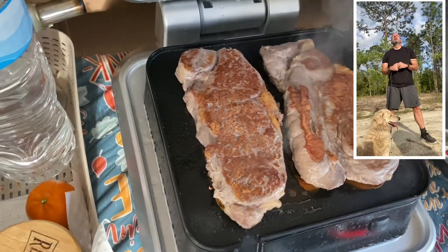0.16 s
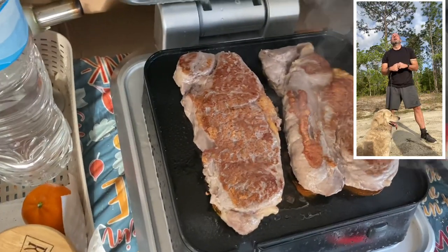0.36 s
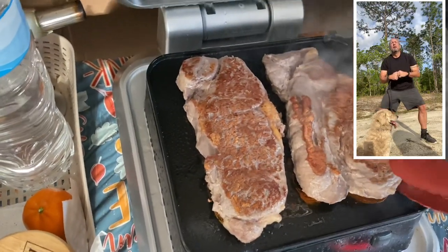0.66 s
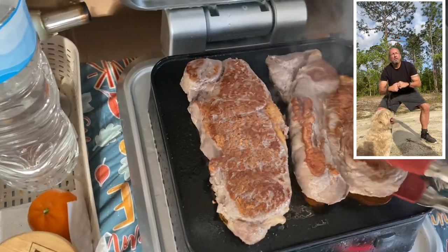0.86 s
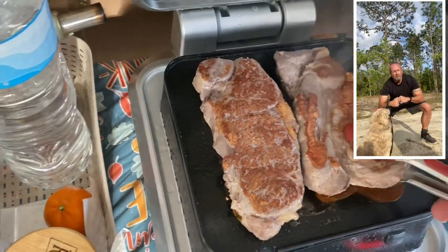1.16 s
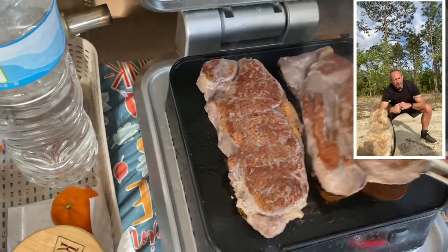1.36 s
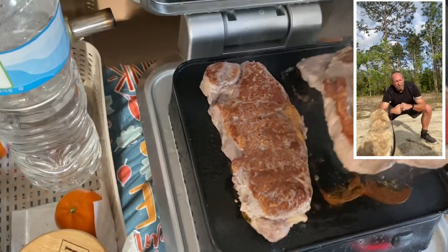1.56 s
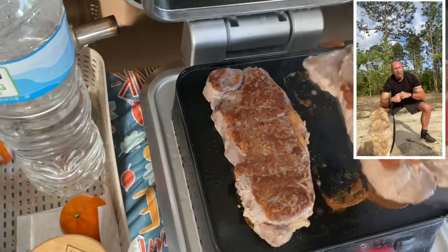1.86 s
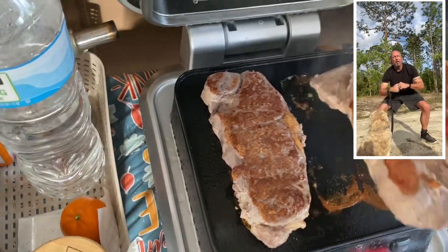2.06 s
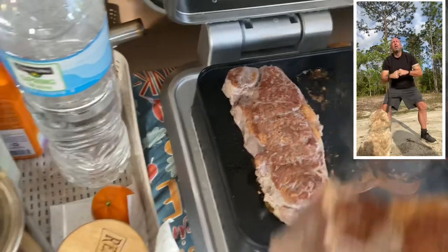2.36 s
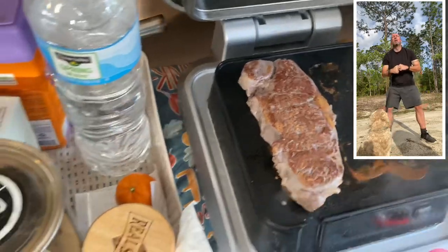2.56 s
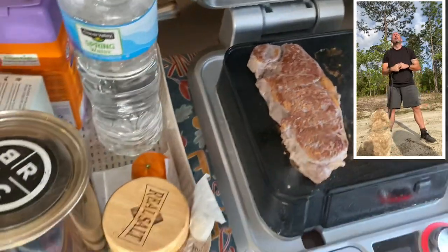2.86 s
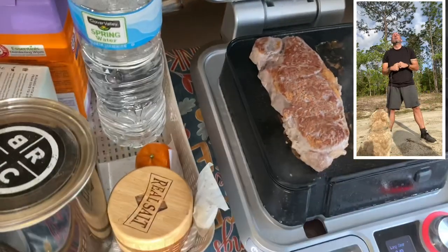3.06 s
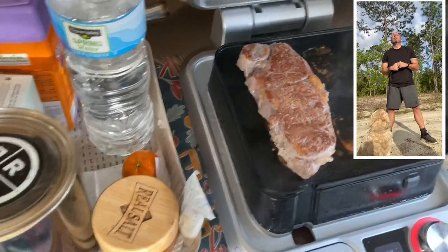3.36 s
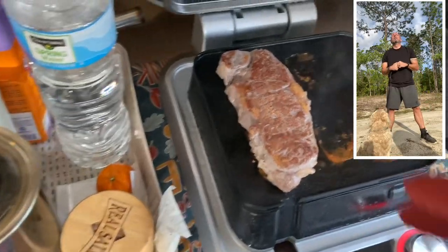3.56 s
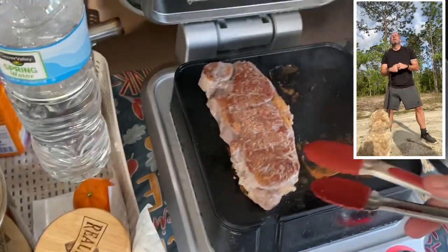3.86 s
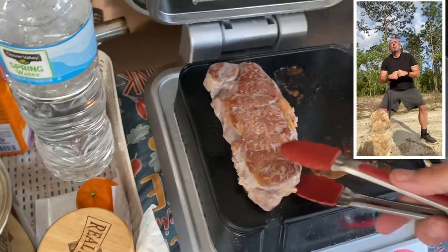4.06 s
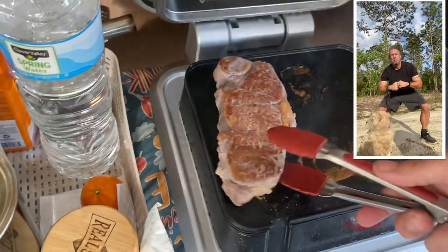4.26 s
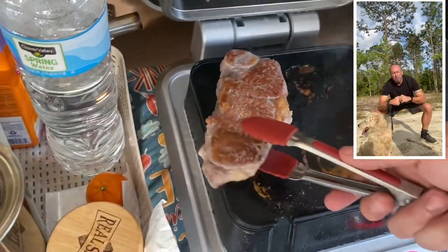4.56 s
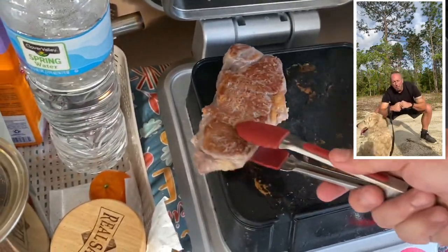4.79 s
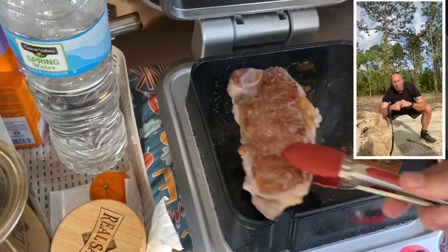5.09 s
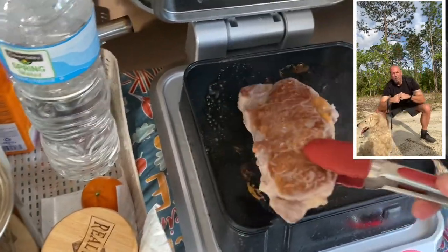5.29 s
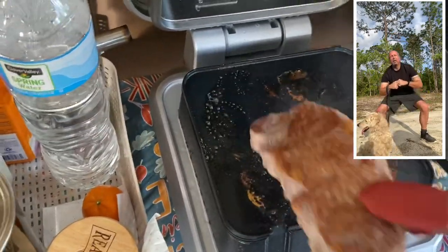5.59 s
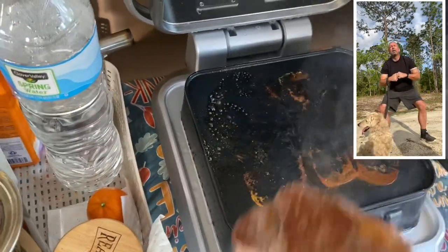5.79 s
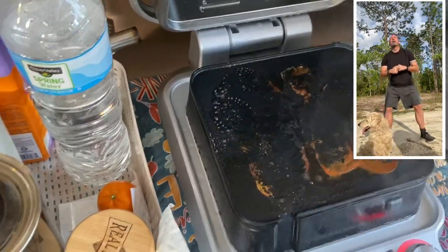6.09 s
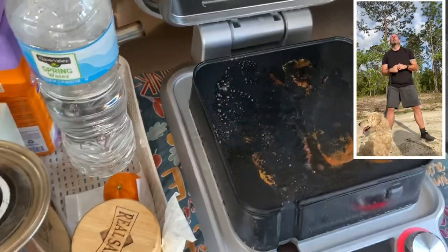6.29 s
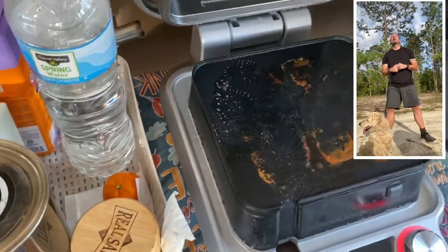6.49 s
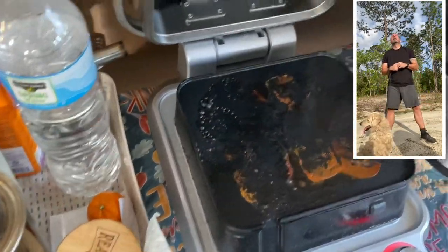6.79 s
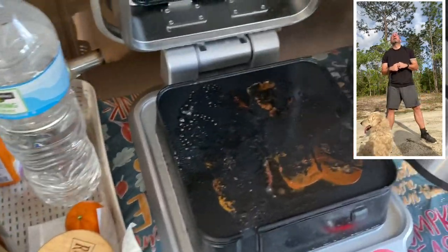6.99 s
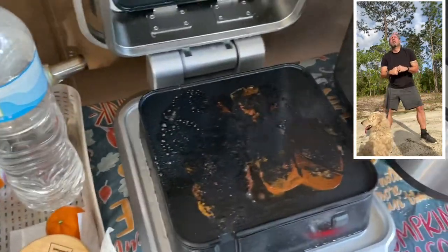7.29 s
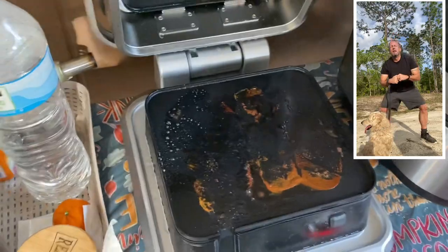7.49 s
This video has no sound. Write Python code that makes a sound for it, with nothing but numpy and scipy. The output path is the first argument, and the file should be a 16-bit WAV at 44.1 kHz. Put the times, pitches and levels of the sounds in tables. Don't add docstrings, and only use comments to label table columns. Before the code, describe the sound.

Meat sizzles in a dense close crackle with sharp fat cracks, swells as it is lifted, then fades to sparse patter and faint squeaks on the plate.

```python
import sys
import numpy as np
from scipy import signal
from scipy.fft import rfft, irfft, next_fast_len
from scipy.io import wavfile
from scipy.ndimage import uniform_filter1d, map_coordinates

SR = 44100
rng = np.random.default_rng(int(sys.argv[2]) if len(sys.argv) > 2 else 0)


def gain_from_db(level_db):
    decades = np.asarray(level_db, float) / 20
    return 10 ** decades


def master(y):
    cut = np.clip(np.atleast_2d(y).T, -1, 1)
    pcm = np.round(cut * 32767)
    wavfile.write(sys.argv[1], SR, pcm.astype(np.int16))


N = 336914


def unit(x):
    return x / np.sqrt(np.mean(x ** 2) + 1e-20)


def along(points, hz):
    f, v = np.transpose(points)
    return np.interp(np.log(hz + .1), np.log(f + .1), v)


def curves(rows, at):
    s, *cols = np.transpose(rows)
    return [np.interp(at, s, c) for c in cols]


def wobble(rate):
    knots = rng.standard_normal(int(N * 200 / SR))
    return map_coordinates(knots, [np.arange(N) * min(rate, 190) / SR], order=2)


def noise(gain):
    m = next_fast_len(N)
    spectrum = rfft(rng.standard_normal(m)) * gain(np.fft.rfftfreq(m, 1 / SR))
    return unit(irfft(spectrum, m)[:N])


def impulse(gain):
    size = 16384
    cepstrum = irfft(np.log(gain(np.fft.rfftfreq(size, 1 / SR)) + 1e-6))
    cepstrum[1:size // 2] *= 2
    cepstrum[size // 2 + 1:] = 0
    return irfft(np.exp(rfft(cepstrum)))[:size // 8]


# pitch_hz, density_db (per Hz)
PLATE_COLOUR = [(300, -26.5), (500, -11), (700, -22.5), (850, -10.5), (1400, -1), (2500, 1), (3500, 3.5),
                (4250, -4), (4750, -13), (6300, 0.5), (7000, -4.5), (7900, -13), (11300, -16.5),
                (12600, -24), (15800, -25.5)]


def plate_gain(hz):
    return gain_from_db(along(PLATE_COLOUR, hz))


def plate_band(edges):
    lo, hi = edges

    def gain(hz):
        return plate_gain(hz) / np.sqrt((1 + (lo / (hz + 1)) ** 16) * (1 + (hz / hi) ** 16))
    return impulse(gain)


def bubbles(cycles):
    draws = rng.random((9000, 3))
    t = np.arange(384) / SR
    hz = 700 + 14500 * draws[:, 1:2] ** 1.5
    size = -np.log(draws[:, 2:] + 0.12) * np.sqrt(hz)
    rings = size * np.sin(2 * np.pi * hz * t * (1 + 8 * t)) * np.exp(-t * hz / cycles)
    place = (draws[:, :1] * N).astype(int) + np.arange(len(t))
    return unit(np.bincount(place.ravel(), rings.ravel())[:N])


# start_s, vigour_db, fineness_db
FRYING = [(0, -37.5, -2), (.8, -38, -3.5), (.97, -32.5, -4.5), (1.27, -33, -2.5), (1.5, -43.5, -1),
          (1.7, -44.5, 2.2), (2.3, -45, 0.2), (4.05, -46.5, 2.3), (4.32, -41, 0), (4.7, -43, -6),
          (4.98, -39.5, -5.5), (5.2, -46, 2), (5.9, -56, 2.5), (6.1, -55.5, 0.1), (6.75, -64.5, 7),
          (6.98, -75, 8), (7.15, -62, -5), (7.64, -66, -8)]
# low_hz, high_hz
BANDS = [
    (200, 2400),
    (2400, 4800),
    (4800, 8000),
    (8000, 17000),
]
# calm_level_db, growth_with_vigour (dB per dB), growth_with_fineness (dB per dB)
BAND_LEVELS = [
    (-50.5, 0.98, 0.35),
    (-45.5, 0.95, 0.019),
    (-48.5, 0.99, 0.65),
    (-53.5, 0.71, 0.4),
]
# start_s, spread_db
SIZE_SPREAD = [(0, 2.5), (5, 2.5), (5.8, 4), (7.64, 5)]
# centre_s, extra_fineness_db
FLARES = [
    (.55, 1.5),
    (1.67, 5),
    (2.07, 3),
    (2.62, 2.5),
    (3.4, 1),
    (4.86, 2),
    (5.72, 4),
    (6.05, 1.5),
]


def crackle():
    t = np.arange(N) / SR
    draws = rng.random((30000, 7))
    s = draws[:, 0] * (N - 1) / SR
    place = (s * SR).astype(int)
    spread_db, = curves(SIZE_SPREAD, s)
    polarity = np.sign(draws[:, 2] - .5)
    size = gain_from_db(-spread_db * np.log(draws[:, 1] + .004)) * polarity
    clump = gain_from_db(0.28 * wobble(14) + 0.11 * wobble(45) + 0.067 * wobble(120))

    vigour_db, fine_db = curves(FRYING, t)
    flare_s, steak_calm_db = 0.049, -45
    for at, db in FLARES:
        fine_db = fine_db + db * np.exp(-((t - at) / flare_s) ** 2)

    rings = .5 * bubbles(cycles=4.0)
    wet = np.interp(t, [5, 6], [1, .45])
    out = np.zeros(N)
    for k, (edges, (calm_db, grows, fines)) in enumerate(zip(BANDS, BAND_LEVELS)):
        brightness = gain_from_db(10.3 * (draws[:, 3 + k] - .5))
        bursts = np.bincount(place, size * brightness, N)
        power = uniform_filter1d(uniform_filter1d(bursts ** 2, SR // 4), SR // 4)
        bursts /= np.sqrt(np.abs(power) + 1e-12)
        steam = 1.4 * wet * rng.standard_normal(N)
        band = signal.oaconvolve(bursts + rings + steam, plate_band(edges))[:N]
        level_db = calm_db + grows * (vigour_db - steak_calm_db) + fines * fine_db
        level_db = level_db + 0.21 * wobble(40) + 0.38 * wobble(6)
        out += gain_from_db(level_db) * clump * wet ** 0.073 * unit(band)
    return out


# pitch_hz, density_db (per Hz)
ROOM_COLOUR = [(26, -30), (45, -13), (75, -19), (170, -23), (250, -17), (510, -18), (665, -24), (755, -16),
               (880, -22), (1310, -21), (3640, -28), (4730, -40), (6650, -33), (15800, -56)]
# start_s, level_db
ROOM_LEVEL = [(0.0, -59.5), (1.17, -57), (1.53, -59), (6.49, -61.5), (7.64, -60)]
# pitch_hz, level_db (rms)
HUM = [
    (120, -73),
    (297, -73),
    (372, -76),
    (512, -78),
    (757, -82),
    (1497, -74),
]
# pitch_hz, density_db (per Hz)
AIR_COLOUR = [(1, -61), (3, -6.5), (5, 6), (8, 8), (14, -18.5), (23, -16.5), (27, -17), (31, -33),
              (60, -72)]


def background():
    t = np.arange(N) / SR
    level_db, = curves(ROOM_LEVEL, t)
    room = gain_from_db(level_db + 1.5 + 0.9 * wobble(2.985)) * noise(lambda hz: gain_from_db(along(ROOM_COLOUR, hz)))
    hum = np.zeros(N)
    for hz, db in HUM:
        level = gain_from_db(db + 3 + 1.5 * wobble(5))
        hum += level * np.sin(2 * np.pi * hz * t + .7 * wobble(5))
    air = gain_from_db(-42.0) * np.tanh(20 * t) * noise(lambda hz: gain_from_db(along(AIR_COLOUR, hz)))
    return room + hum + air


CRACK_LEAD = 64


def crack(edges):
    lo, hi = edges
    whole = np.roll(impulse(plate_gain), CRACK_LEAD)
    hz = np.fft.rfftfreq(len(whole), 1 / SR)
    band = irfft(rfft(whole) / ((1 + (lo / (hz + 1)) ** 12) * (1 + (hz / hi) ** 12)))
    return band / np.abs(signal.hilbert(band)).max()


# start_s, peak_db, dull_db, crisp_db (both parts over the peak)
MEAT_SPITS = [(0.012, -9, -25, -31), (0.51, -7, -20, -23), (0.6234, -28, -24, -15), (1.2092, -14, -20, -22),
              (1.2464, -8, -24, -24), (1.4598, -13.5, -22, -19), (1.4934, -25, -19, -13),
              (1.8163, -26, -5, -26), (1.9205, -28, -8, -21), (2.0617, -26, -9, -13),
              (2.2924, -23, -11, -20), (2.682, -16, -21, -21), (2.7851, -17.5, -17, -15.5),
              (2.8594, -35, -20, -12), (3, -28, -16, -17), (3.2184, -26, -27, -13), (3.415, -17, -26, -20),
              (4.0174, -28, -18, -19), (4.1206, -27, -13, -20), (4.2701, -23, -14, -11),
              (4.372, -30, -16, -15), (4.471, -16, -31, -19), (4.7047, -16, -29, -22),
              (4.7235, -16, -25, -21), (4.766, -23.5, -16, -8), (4.927, -30, -26, -23),
              (5.1864, -31, -7, -15)]
# start_s, peak_db, dull_db, crisp_db (both parts over the peak)
PLATE_SPITS = [(5.3548, -25, -12, -16), (5.3924, -27, -13, -13), (5.453, -30, -10, -23),
               (5.4789, -28, -13, -21), (5.6735, -26, -22, -12), (5.7279, -33, -19, -16),
               (5.7997, -30, -23, -19), (5.872, -33, -11, -15), (6.0112, -30.5, -18, -9.5),
               (6.0438, -31, -15, -13), (6.0691, -30, -15, -12), (6.097, -41, -16, -17),
               (6.1342, -38, -8, -20), (6.2073, -31, -17, -15), (6.3609, -38, -18, -19),
               (6.4157, -28.5, -22, -14), (6.4457, -48, -14, -16), (6.4878, -35, -17, -8),
               (6.5111, -32.5, -14, -15), (6.5562, -33, -17, -15), (6.6262, -34, -18, -11),
               (6.6508, -27.5, -17.5, -16), (6.6882, -36, -23, -14), (6.7315, -38, -17, -17),
               (6.751, -29, -20.5, -18), (6.8034, -33.5, -18, -14), (7.0382, -36, -16, -12),
               (7.1644, -36, -21, -8), (7.22, -33.5, -15, -17), (7.5609, -29, -17, -13.5)]
# gurgle_db over dull, body_db over peak, fizz_db and spray_db over crisp
SPIT_TRIM_DB = [7, -7, 5.5, -2]
# gurgle_db, body_db, fizz_db, spray_db
PATTER_DB = [6.5, 13, 11, 9.9]
PATTER_S, PATTER_COUNT, PATTER_SCATTER_DB = (5.32, 7.45), 90, 4


def drops():
    s, peak_db, dull_db, crisp_db = np.transpose(list(MEAT_SPITS) + list(PLATE_SPITS))
    parts_db = np.c_[dull_db, 0 * s, crisp_db, crisp_db]
    lag_s = .001
    large = np.c_[s + lag_s, peak_db[:, None] + parts_db + SPIT_TRIM_DB]

    at = rng.uniform(*PATTER_S, PATTER_COUNT)
    scatter_db = PATTER_SCATTER_DB * rng.standard_normal((PATTER_COUNT, len(BANDS)))
    vigour_db = np.maximum(curves(FRYING, at)[0], -64)
    small = np.c_[at, vigour_db[:, None] + PATTER_DB + scatter_db]
    return np.r_[large, small]


# delay_s, level_db
ECHOES = [(.0017, -11), (.0028, -14), (.0054, -9), (.0064, -14), (.0108, -12)]


def spits():
    t = np.arange(SR // 20) / SR
    delay_s, echo_db = np.transpose(ECHOES)
    shelter_db = -9
    trains = np.zeros((len(BANDS), N + SR))
    for s, *band_db in drops():
        splinters = rng.uniform(-1, 1, len(t)) * (rng.random(len(t)) < .12)
        answer = .26 * gain_from_db(-60 * t / .07) * splinters
        spot = rng.normal(0, 1, (2, len(ECHOES)))
        echo_at = (SR * delay_s * (1 + .04 * spot[0])).astype(int)
        answer[echo_at] = gain_from_db(echo_db + 2.5 * spot[1])
        answer = answer * gain_from_db(shelter_db * (s < PATTER_S[0]))
        answer[0] = 1
        trains[:, round(s * SR):][:, :len(t)] += gain_from_db(np.array(band_db))[:, None] * answer
    out = np.zeros(N)
    for train, edges in zip(trains, BANDS):
        out += signal.oaconvolve(train, crack(edges))[CRACK_LEAD:CRACK_LEAD + N]
    return gain_from_db(-2.5) * out


# start_s, level_db, pitch_hz
BUMPS = [
    (.64, -45, 90),
    (3.27, -51, 60),
    (5.77, -43.5, 110),
    (6.4465, -33, 1400),
    (7.625, -42, 60),
]


def bumps():
    t, out = np.arange(SR // 8) / SR, np.zeros(N + SR)
    for s, db, hz in BUMPS:
        out[round(s * SR):][:len(t)] += gain_from_db(db) * np.sin(2 * np.pi * hz * t) * np.exp(-t * hz / .7)
    return out[:N]


# start_s, peak_db, pitch_hz, t60_s
SQUEAKS = [(5.6331, -42, 11800, 0.064), (5.6885, -32, 10300, 0.06), (5.7476, -31, 10100, 0.08),
           (6.0442, -34, 10300, 0.065), (6.0691, -45, 10700, 0.098), (6.5565, -35, 11600, 0.057),
           (6.6308, -43, 11400, 0.08), (6.802, -39, 9760, 0.08), (6.8623, -59, 9530, 0.08),
           (7.036, -43, 11600, 0.08), (7.2399, -48, 12600, 0.074), (7.2789, -51, 10600, 0.08),
           (7.3317, -54, 10300, 0.08), (7.355, -38, 10900, 0.055)]


def squeaks():
    t, out = np.arange(SR // 8) / SR, np.zeros(N + SR)
    for s, db, hz, t60 in SQUEAKS:
        roughness = np.cumsum(rng.normal(0, .3, len(t)))
        tone = np.sin(2 * np.pi * hz * (t - .9 * t ** 2) + roughness)
        attack = 1 - np.exp(-t / .004)
        out[round(s * SR):][:len(t)] += gain_from_db(db - 8.5 - 60 * t / max(t60, .005)) * attack * tone
    return out[:N]


# start_s, length_s, level_db (rms), pitch_hz, width_hz
WHINES = [
    (6.5, .16, -68, 2650, 40),
    (7.2, .17, -66, 1850, 12),
    (7.3, .23, -67, 2150, 40),
    (7.3, .27, -65, 2500, 500),
    (7.48, .08, -68, 1150, 150),
    (6.4, 1.3, -75, 757, 25),
]


def whines():
    t, out = np.arange(N) / SR, np.zeros(N)
    for s, length, db, hz, width_hz in WHINES:
        swell = np.abs(np.sin(np.pi * np.clip((t - s) / length, 0, 1))) ** .5
        vent = swell * noise(lambda f: 1 / (1 + ((f - hz) / width_hz) ** 2))
        out += gain_from_db(db) * unit(vent) * np.sqrt(length * SR / N)
    return out


# pitch_hz, t60_s
WALL_DECAY = [(500, 0.35), (3000, 0.095), (12000, 0.033)]


def walls(x):
    hz, t, z = signal.stft(rng.standard_normal(SR // 3), SR, nperseg=256)
    decay = gain_from_db(-60 * t / along(WALL_DECAY, hz)[:, None])
    tail = signal.istft(z * decay, SR, nperseg=256)[1]
    return signal.fftconvolve(np.pad(x, (60, 0)), tail / np.linalg.norm(tail))[:N]


def scene():
    fry = crackle()
    pops = spits() + squeaks()
    answer = walls(gain_from_db(-12) * fry + gain_from_db(-11) * pops)
    mono = fry + pops + answer + bumps() + whines() + background()
    return np.array([mono, mono])


def roll_off(x):
    return signal.sosfilt(signal.butter(12, 16430, fs=SR, output="sos"), x)


def record(dry):
    m, top_hz = next_fast_len(N), 15830
    passed = np.fft.rfftfreq(m, 1 / SR) < top_hz
    kept = irfft(rfft(dry, m) * passed, m)[:, :N]
    return roll_off(kept)


dry = scene()
out = record(dry)
master(out)
```